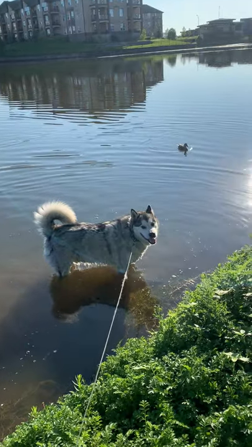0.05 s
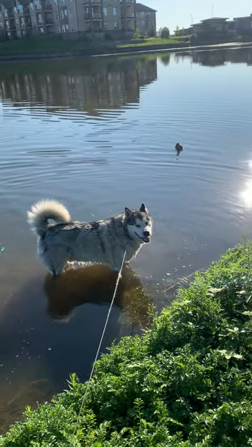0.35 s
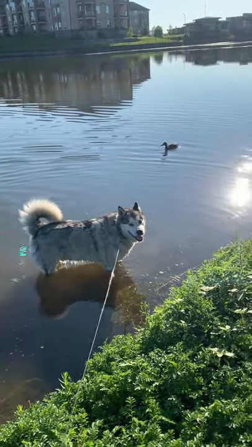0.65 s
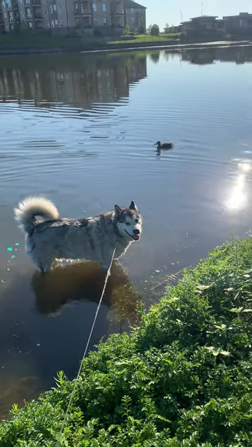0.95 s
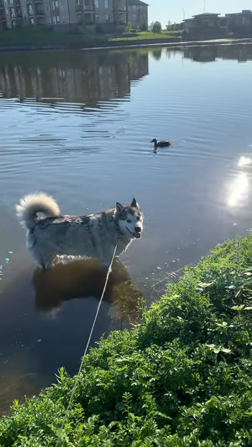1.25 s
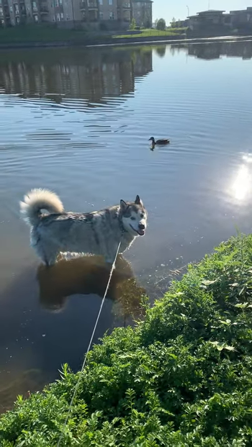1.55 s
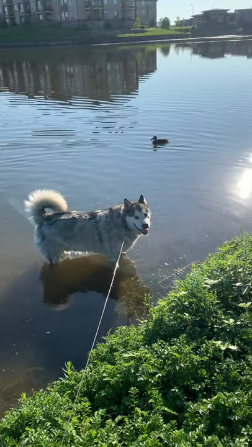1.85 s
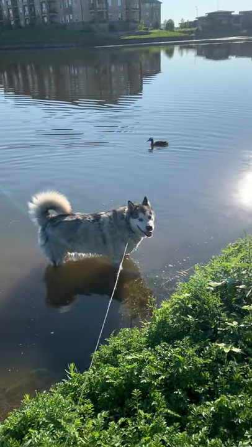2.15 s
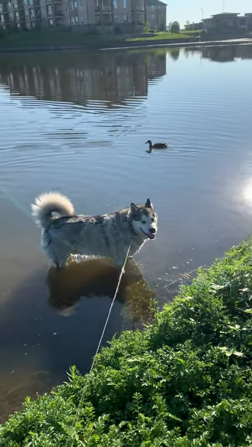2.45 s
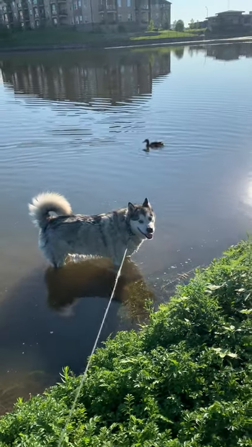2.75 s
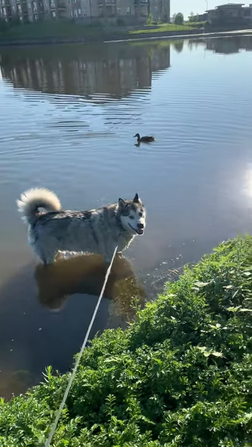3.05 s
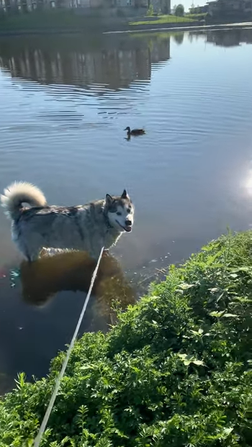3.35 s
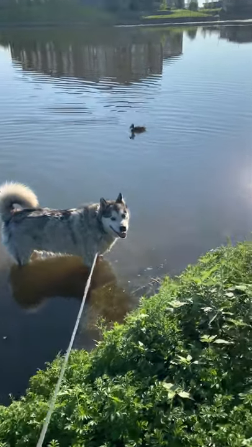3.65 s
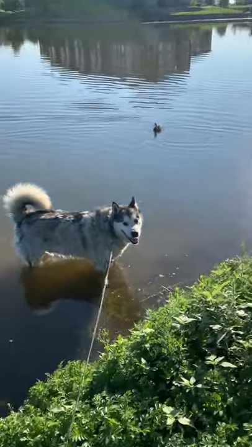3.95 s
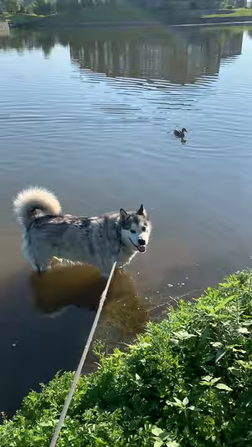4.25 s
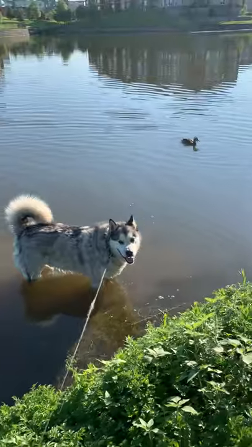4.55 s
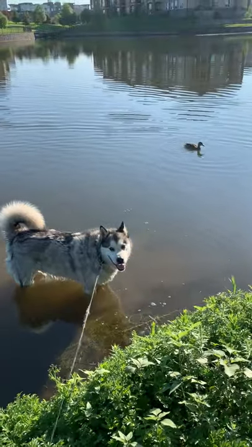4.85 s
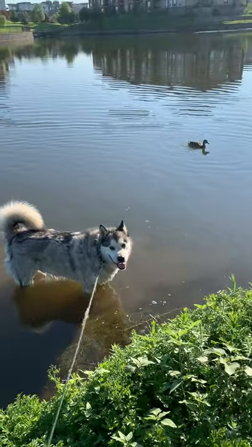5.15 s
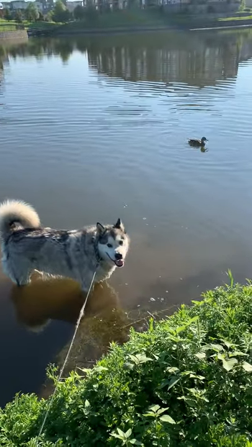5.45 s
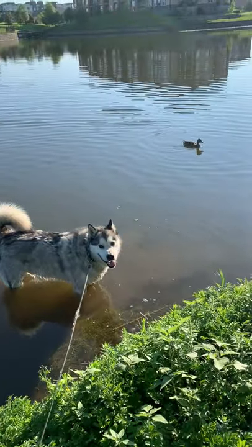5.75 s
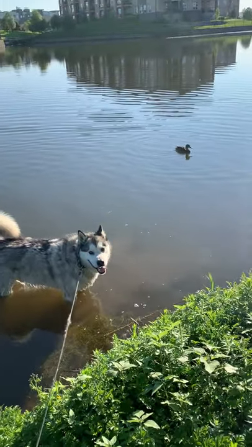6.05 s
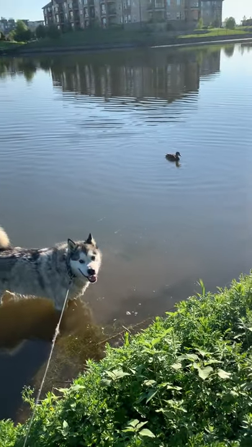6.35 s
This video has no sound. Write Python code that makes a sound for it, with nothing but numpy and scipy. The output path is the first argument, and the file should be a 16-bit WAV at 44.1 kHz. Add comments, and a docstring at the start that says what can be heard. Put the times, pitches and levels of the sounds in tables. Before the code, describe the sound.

Beside a lake, a quiet rumble of open air and a far engine runs throughout. In front, a duck repeats one hoarse, nasal quack at an even pace, eight in all, each echoing faintly. The last four are a little louder, with a shifted tone. Close to the microphone, a faint high hiss comes and goes through the middle, along with a few tiny clicks and soft rustles.

```python
"""Eight raspy duck quacks carry over a lake; the bird turns on the water after the fourth.
Each quack is a train of sharp membrane snaps ringing throat and bill, with a rasp of air on top,
and the banks echo it faintly. Behind it sit a low outdoor rumble and a distant engine's drone.
A high hiss swells a few times close by, among tiny ticks, soft swishes and a faint high ring."""
import sys
import numpy as np
from scipy import signal
from scipy.fft import rfft, irfft, next_fast_len
from scipy.io import wavfile
from scipy.ndimage import uniform_filter1d, minimum_filter1d

SR = 44100
rng = np.random.default_rng(int(sys.argv[2]) if len(sys.argv) > 2 else 0)


def transcribe(signal):
    """Save signal, clipped to [-1, 1], as a 16-bit WAV file at the path in sys.argv[1]."""
    frames = np.atleast_2d(signal).T
    limited = np.clip(frames, -1, 1)
    pcm = np.round(limited * 32767).astype(np.int16)
    wavfile.write(sys.argv[1], SR, pcm)


N = 291501
TIME = np.arange(N) / SR


def undb(db):
    """Decibels to gain."""
    return 10 ** (np.asarray(db) / 20)


def unit(x):
    """Scale to rms 1."""
    return x / np.sqrt(np.mean(x ** 2) + 1e-20)


def shape(points, f):
    """EQ curve in dB through (Hz, dB) points, falling 40 dB an octave beyond its ends."""
    hz, db = np.transpose(points)
    octave, known = np.log2(np.maximum(f, 1)), np.log2(hz)
    return np.interp(octave, known, db) - 40 * abs(octave - np.clip(octave, known[0], known[-1]))


def bump(x, centre, width):
    """Bell curve over frequency or time, 1 at its centre."""
    return np.exp(-.5 * ((x - centre) / width) ** 2)


def colour(x, gain_db, causal=1):
    """EQ by the curve gain_db(f); causal 1 rings after a pulse, 0 swells and fades alike."""
    size = 2 * next_fast_len(len(x) // 2 + 2048)
    db = gain_db(np.arange(size // 2 + 1) * SR / size)
    cepstrum = irfft(np.log(undb(np.maximum(db, db.max() - 90))))
    cepstrum[1:size // 2] *= 1 + causal
    cepstrum[size // 2 + 1:] *= 1 - causal
    return irfft(rfft(x, size) * np.exp(rfft(cepstrum)))[:len(x)]


def band(x, lo_hz, hi_hz, order=2):
    """Band-pass filter."""
    sos = signal.butter(order, [lo_hz, min(hi_hz, .45 * SR)], "band", fs=SR, output="sos")
    return signal.sosfilt(sos, x)


def walk(rate_hz):
    """Smooth random modulation with rms 1."""
    step = int(SR / rate_hz)
    held = np.repeat(rng.standard_normal(N // step + 1), step)
    return unit(uniform_filter1d(held, step)[:N])


def rumble(body_db=-42.88, swell_db=-0.3, dip_db=4):
    """A low bed of distant traffic and open air, gently swelling."""
    # tone of the bed: (frequency [Hz], relative level [dB])
    spectrum = [(12, -48), (20, -19), (80, 1), (92, -4.5), (103, -11.5), (140, -10), (191, -13.5),
                (478, -28), (767, -26.5), (1010, -25.5), (1820, -34.5), (1980, -33.5), (3170, -44),
                (9390, -60.5), (15500, -106)]
    noise = colour(rng.standard_normal(N), lambda f: shape(spectrum, f) - dip_db * bump(f, 72.6, 16.0))
    body = np.std(band(noise, 100, 1500, order=4))
    return noise / body * undb(body_db + swell_db * walk(4.86))


def engine(start_hz=74.2, rise_hz_per_s=0.78, level_db=-44.5, waver_db=2.0, wander=0.0336):
    """A far engine slowly speeds up; only its wavering firing tone carries."""
    hz = (start_hz + rise_hz_per_s * TIME) * (1 + wander * walk(12))
    tone = unit(np.sin(2 * np.pi * np.cumsum(hz) / SR))
    return tone * undb(level_db + waver_db * walk(14))


def whine(peak_s=2.3, half_length_s=.7, peak_db=-71, waver_db=4.0, half_width_hz=35):
    """A faint, diffuse ring of narrow noise bands swells once and fades."""
    # tones of the ring: (frequency [Hz], relative level [dB])
    tones = [(4050, -5), (4720, -7), (7900, -12)]
    ring = 0
    for hz, db in tones:
        gain = undb(db + waver_db * walk(7.7))
        ring += gain * unit(band(rng.standard_normal(N), hz - half_width_hz, hz + half_width_hz, order=1))
    return unit(ring) * undb(peak_db) / (1 + ((TIME - peak_s) / half_length_s) ** 2)


def swishes(edge_ratio=1.28):
    """Brief soft rustles near the shore, each a breath of band-passed noise."""
    # (time [s], half length [s], centre [Hz], level [dB])
    rustles = [(0.846, 0.04, 2800, -62.5), (5.173, 0.023, 8750, -68), (5.62, 0.06, 7400, -65.5),
               (5.823, 0.016, 6000, -70), (6.059, .02, 5816, -82)]
    out = np.zeros(N)
    for at, half_length, hz, db in rustles:
        noise = unit(band(rng.standard_normal(N), hz / edge_ratio, hz * edge_ratio))
        out += undb(db) * bump(TIME, at, half_length) * noise
    return out


def hiss(start_s=2.8, end_s=5.065, fade_s=0.032, rest_db=-79, raised_db=-66, flicker_db=2.1):
    """A thin, flickering hiss comes forward, swells a few times and sinks back."""
    # tone of the hiss: (frequency [Hz], relative level [dB])
    spectrum = [(1650, 8), (2800, -2.5), (3190, -3), (4630, 0), (6540, -8.5), (7820, 2.5), (9360, 6.5),
                (10600, 2), (12200, 0.5), (15600, -4.5)]
    # (time [s], half length [s], rise [dB])
    swells = [(2.943, 0.056, 12), (3.25, 0.13, 16), (3.532, 0.092, 9), (4.158, 0.14, 13), (4.867, .11, 15)]
    noise = unit(colour(rng.standard_normal(N), lambda f: shape(spectrum, f)))
    gate = (1 + np.tanh(np.minimum(TIME - start_s, end_s - TIME) / (2 * fade_s))) / 2
    swell_db = sum(db * bump(TIME, at, half_length) for at, half_length, db in swells)
    envelope = undb(rest_db) + gate * undb(raised_db + swell_db)
    return noise * envelope * undb(flicker_db * walk(40))


def ticks(decay_s=0.0025, trim_db=-4):
    """Tiny bright clicks close by: noise bursts that die at once."""
    # (time [s], level before trim and filter [dB])
    clicks = [(0.9228, -48), (3.4977, -30.5), (3.8869, -38)]
    envelope = sum(undb(db + trim_db) * (TIME > at) * np.exp(-abs(TIME - at) / decay_s)
                   for at, db in clicks)
    return band(envelope * rng.standard_normal(N), 7620, 15000, order=1)


def banks(calls, cutoff_hz=4500):
    """Grassy banks scatter back a few smeared, dull echoes."""
    # (delay [s], decay time [s], level below the cutoff [dB])
    echoes = [(.003, 0.0098, -23), (0.057, 0.04, -29), (.10, .02, -30.5), (.152, .016, -30.5)]
    t = TIME[:SR // 2]
    response = 0
    for delay, decay, db in echoes:
        cluster = rng.standard_normal(len(t)) * (t > delay) * np.exp(-abs(t - delay) / decay)
        response += undb(db) * cluster / np.linalg.norm(cluster)
    dulled = colour(calls, lambda f: -10 * np.log10(1 + (f / cutoff_hz) ** 2))
    return signal.fftconvolve(dulled, response)[:N]


def syrinx(t, start, end, pitches, rebound, creak=.84, droop=0.91, jitter=.021, loose=0.42,
           scatter_db=-0.3, puff_s=0.0011, puff_db=2, stop_s=0.015):
    """Membranes snap shut once a cycle and rebound weakly; returns the snaps and their puffs of air."""
    snaps, puffs = np.zeros(len(t)), np.zeros(len(t))
    contour_hz = [creak * pitches[0], *pitches, droop * pitches[-1]]
    now = start
    for stretch, size, lag, bounce, gust in rng.standard_normal((64, 5)):
        if now > end:
            break
        progress = (now - start) / (end - start)
        period = 1 / np.interp(progress, [0, .15, .45, .9, 1], contour_hz)
        # a few slow creaks, then a ragged stretch until the pressure has built up
        slack = np.interp(progress, [.06, .16, .42], [0, 1, 0])
        pressure = min(1, (end - now) / stop_s)  # collapses at the very end
        rebound_at = now + period * (.44 + 0.057 * lag)
        rebound_gain = rebound * (1 + 0.4 * bounce) + loose * slack * abs(bounce)
        for at, gain in ((now, undb(scatter_db * size)), (rebound_at, rebound_gain)):
            age_samples = (t - at) * SR
            snaps += pressure * gain * np.sinc(age_samples) * (abs(age_samples) < 16)
            puffs += pressure * gain * undb(puff_db * gust) * np.exp(-abs(t - at) / puff_s)
        now += period * (1 + jitter * (1 + 2 * slack) * stretch)
    return snaps, puffs


def vowel(source, opening, throat_db, lowering=0.11, blur=0.49, closed_db=-3, hum_db=4, stages=4):
    """Resonances glide up as the bill opens; half shut, it lowers and blurs them and rings on one note."""
    out = 0
    for shut in np.linspace(0, 1, stages):
        def stage_db(f):
            blurred = (1 - blur * shut) * throat_db(f * (1 + lowering * shut))
            return blurred + shut * hum_db * bump(f, 1660, 90)
        crossfade = np.maximum(0, 1 - abs(1 - opening - shut) * (stages - 1))
        out += crossfade * undb(closed_db * shut) * unit(colour(source, stage_db, causal=.7))
    return out


def bill(f, twang_hz, twang_db, bite_db, bright_db, ripple_db=2.0, ripple_hz=230):
    """EQ of the rasp in dB: broad bill resonances, narrow nasal ones and a ripple new to each quack."""
    # air rasping through the bill: (frequency [Hz], relative level [dB])
    rasp = [(1710, -13), (2900, 1), (3300, -3), (3800, -6.5), (4400, -10), (5100, -12), (6100, -9.5),
            (7300, -9.5), (8000, -10), (9200, -10), (11000, -14.5), (13000, -20.5), (15600, -35)]
    # peaks and dips of windpipe and nostrils: (frequency [Hz], width [Hz], gain [dB])
    nasal = [(3120, 140, 1.5), (4290, 110, -5), (4680, 160, 3), (5350, 270, -2.5), (5700, 290, -0.5),
             (7600, 87, -4), (8150, 86, -0.5), (8100, 140, 2.5), (9100, 220, 3.5)]
    twang = twang_db * bump(f, twang_hz, 380)
    bite = bite_db * bump(f, 6150, 620)
    brightness = bright_db * bump(f, 10300, 3000)
    narrow = sum(db * bump(f, hz, width) for hz, width, db in nasal)
    ripple = np.interp(f / ripple_hz, np.arange(128), rng.standard_normal(128))
    return shape(rasp, f) + twang + bite + brightness + narrow + ripple_db * ripple


def effort(age, held_db, catch_db, onset_db=20.5, attack_s=0.04, catch_s=0.038, catch_width_s=0.0044):
    """Envelope of a quack in dB: a quick climb, a brief catch in the voice, then a steady hold."""
    climb = held_db - onset_db * np.exp(-np.maximum(age, 0) / attack_s)
    return climb - catch_db * bump(age, catch_s, catch_width_s)


def quack(t, row, throat, breath_db=-15, chest_db=-21, peak_db=8.0, notch_db=-9, open_s=0.072,
          strain=0.52):
    """One call: the bill opens on a throaty voice, a hollow chest note and a rasp, then it stops dead."""
    start, end, held_db, catch_db, rebound = row[:5]
    pitches = row[5:8]
    main_hz, notch_hz, rasp_db, growth_db, *bill_shape = row[8:]
    snaps, puffs = syrinx(t, start, end, pitches, rebound)
    air = unit(puffs * rng.standard_normal(len(t)))
    source = unit(snaps) + undb(breath_db) * air
    opening = np.clip((t - start) / open_s, 0, 1) ** 2
    voice = vowel(source, opening, lambda f: shape(throat, f) + peak_db * bump(f, main_hz, 155))
    chest = unit(band(source, 229, 405))
    rasp = unit(colour(0.77 * unit(snaps) + air, lambda f: bill(f, *bill_shape)))
    level_db = effort(t - start, held_db, catch_db)
    # the rasp needs more effort than the voice, and grows or recedes along the call
    strain_db = strain * (level_db - held_db) + growth_db * np.interp(t, [start, end], [-.7, .3])
    call = voice + undb(chest_db) * chest + undb(rasp_db + strain_db) * rasp
    fill = np.sqrt((end - start) / (t[-1] - t[0]))  # the silent margins do not count towards the rms
    return fill * undb(level_db) * colour(call, lambda f: notch_db * bump(f, notch_hz, 63))


def duck():
    """Eight quacks; the tone shifts after the fourth as the duck turns on the water."""
    # one row a quack: (start [s], end [s], held level [dB], catch depth [dB], rebound [0-1],
    # opening pitch [Hz], middle pitch [Hz], closing pitch [Hz], main resonance [Hz], notch [Hz],
    # rasp [dB], rasp growth [dB], twang [Hz], twang [dB], bite [dB], brightness [dB])
    calls = [ (.311, .548, -24, 8, 0.46, 149.8, 165.2, 150.3, 1850, 2700, -17, -1.5, 3770, 5, -2, 0.5),
             (1.097, 1.329, -23.5, -2, 0.36, 136.6, 161, 148.2, 1914, 2860, -19, 3, 4650, -11, 4.5, -4),
             (1.903, 2.128, -23.5, 8, 0.35, 142.6, 169.3, 153.1, 1970, 2940, -17.5, -6, 4370, -7.5, -1, -8),
             (2.766, 2.985, -24, -3.5, 0.36, 123.8, 158.8, 168.2, 1870, 2950, -18.5, -6, 4200, -6, -2.5, -8.5),
             (3.648, 3.872, -20.5, 6, 0.37, 140.3, 164.2, 155.4, 2000, 2840, -17.5, 7, 3300, 4, 0, 9),
             (4.540, 4.765, -21, -1, 0.48, 123.5, 143.6, 144.2, 1974, 2510, -21, -2, 4180, 8.5, 2.5, 3),
             (5.346, 5.578, -20.5, 5, 0.26, 132.2, 162, 166.1, 2060, 2395, -22, -0.5, 4400, 4, 9, -1.5),
             (6.19, 6.412, -20, 1.5, 0.25, 140.2, 164.5, 166, 2086, 2820, -19.5, 7.5, 4480, 1.5, 10.5, 4.5)]
    # throat and bill as heard before and after the turn: (frequency [Hz], relative level [dB])
    throat_before = [(260, -29), (450, -28), (494, -20), (560, -10), (654, -14.5), (713, -10), (814, -10.5),
                     (901, -20), (989, -8), (1370, -13.5), (1710, 0.5), (1960, -0.5), (2480, 2),
                     (2900, -36), (3770, -71), (6380, -120)]
    throat_after = [(260, -35), (450, -18), (610, -21.5), (807, -13), (887, -20.5), (989, -14.5),
                    (1090, -19), (1290, -3), (1520, -22.5), (1690, 0.5), (1980, -2), (2170, -4),
                    (2390, -10), (2900, -26), (3770, -87), (6380, -120)]
    out = np.zeros(N)
    for k, row in enumerate(calls):
        start, end = row[:2]
        inside = (TIME > start - .01) & (TIME < end + .03)
        throat = throat_before if k < len(calls) // 2 else throat_after
        out[inside] += quack(TIME[inside], row, throat)
    return out


def scene():
    """Mono mix: the duck up front, its echoes and the lakeside bed behind."""
    calls = duck()
    return (calls + banks(calls) + engine() + rumble() + hiss() + ticks() + swishes() + whine())[None]


def record(dry, ceiling_db=-12.0, top_hz=15550):
    """A fast limiter evens out the tallest pulses; a steep low-pass cuts the top."""
    window = SR // 250  # 4 ms
    allowed = np.minimum(1, undb(ceiling_db) / (abs(dry) + 1e-9))
    gain = uniform_filter1d(minimum_filter1d(allowed, window), window)
    return signal.sosfilt(signal.ellip(10, .2, 80, top_hz, fs=SR, output="sos"), dry * gain)


dry = scene()
out = record(dry)
transcribe(out)
```